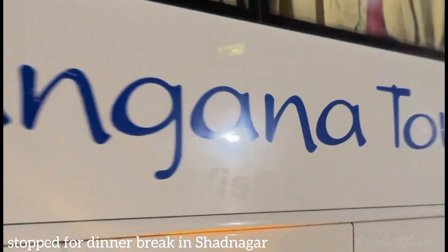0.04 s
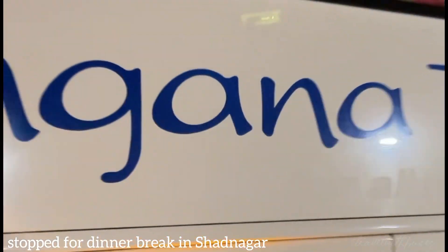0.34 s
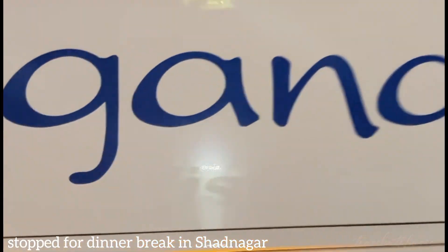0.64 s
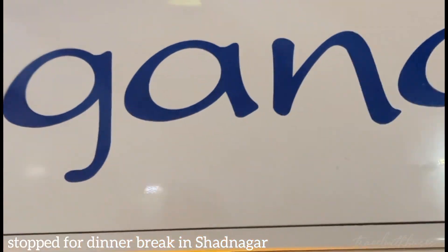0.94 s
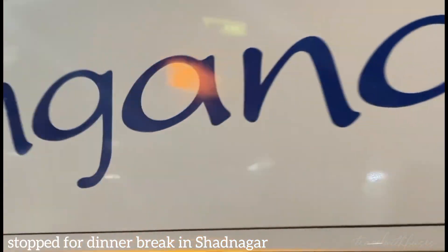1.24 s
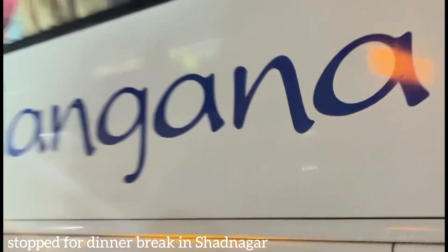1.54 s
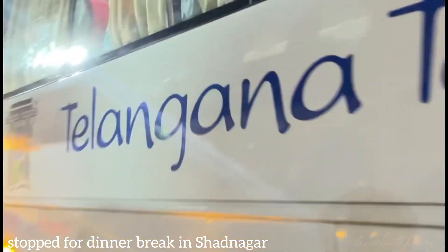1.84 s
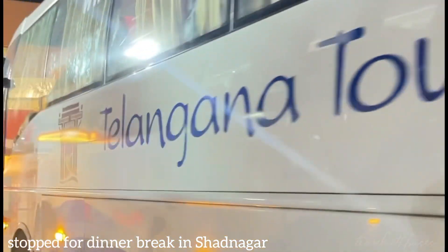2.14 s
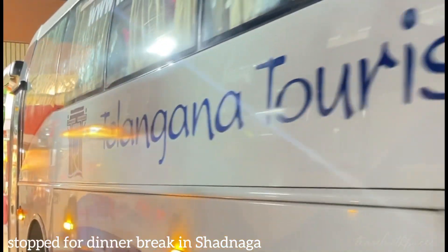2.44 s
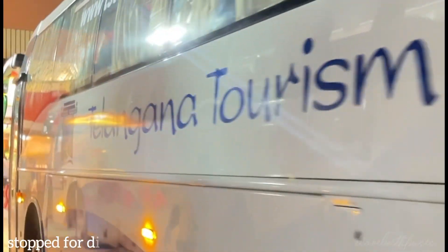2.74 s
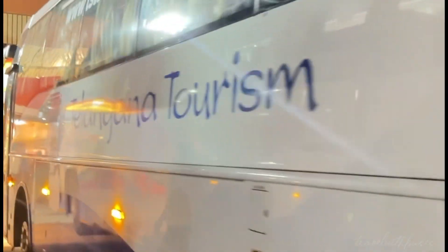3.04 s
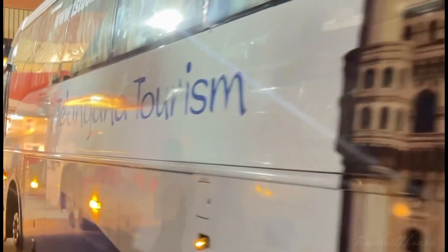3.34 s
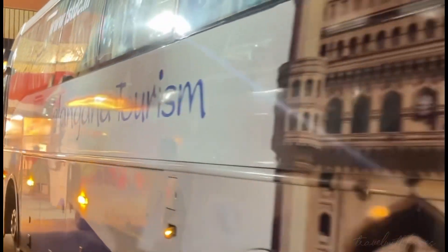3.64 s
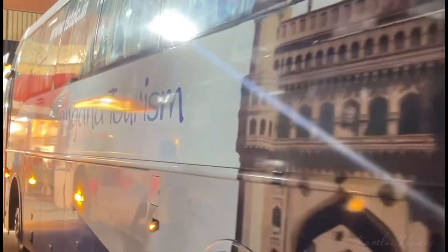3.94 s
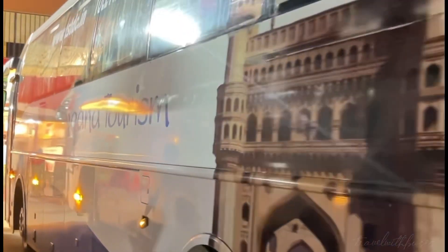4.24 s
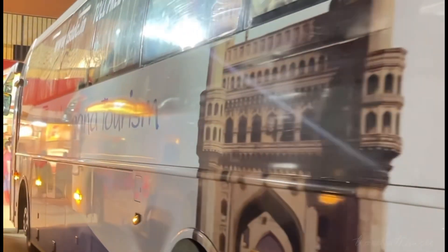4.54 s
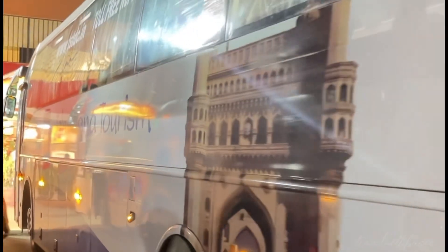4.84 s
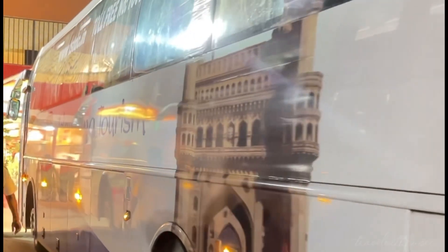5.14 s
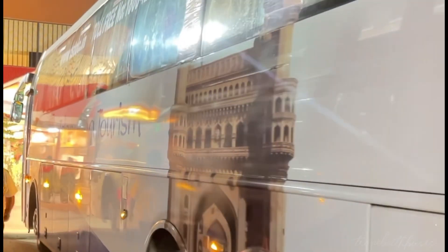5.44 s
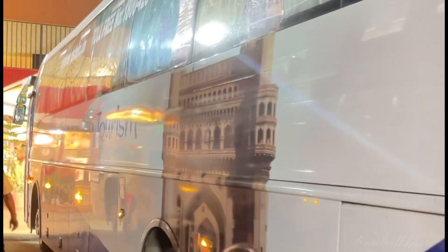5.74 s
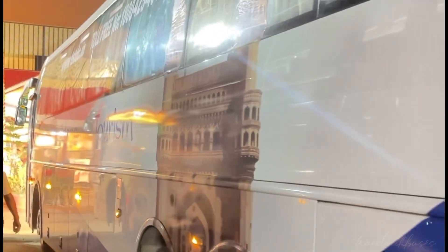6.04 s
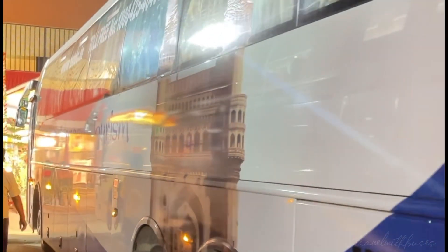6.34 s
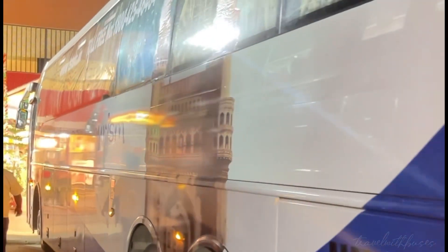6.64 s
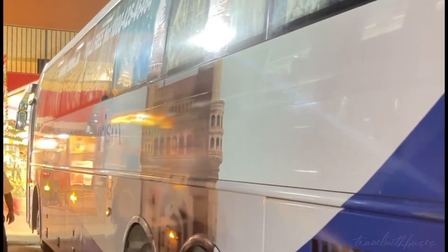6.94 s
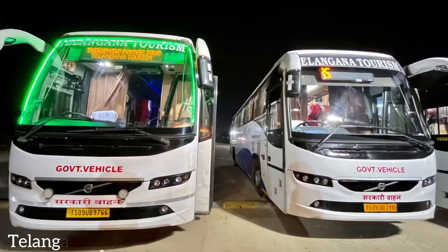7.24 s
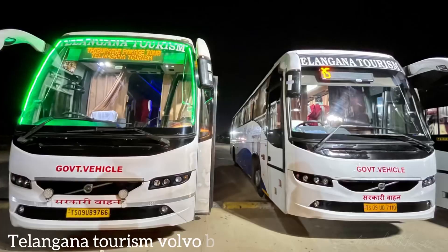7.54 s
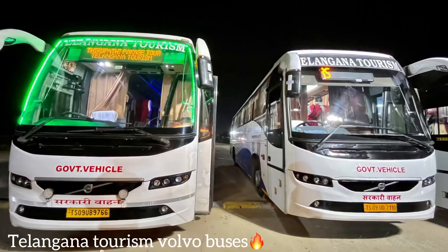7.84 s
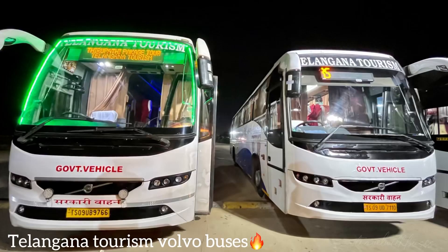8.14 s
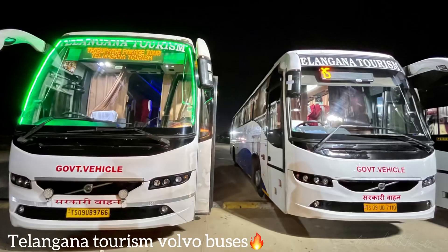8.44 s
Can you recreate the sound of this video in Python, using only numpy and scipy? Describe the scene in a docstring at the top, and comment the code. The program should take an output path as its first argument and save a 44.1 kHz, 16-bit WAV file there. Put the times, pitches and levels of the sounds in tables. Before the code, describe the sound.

Close by in an outdoor lot, a bus engine and its fan wind down over a faint gritty tyre rustle. Two blips of the throttle and a short air puff follow as the engine draws level. High, stuttering brake squeals give way to fainter ones over a rumbling idle. The sound drops out for an instant, then the parked bus idles on, clattering and whistling thinly.

```python
"""A diesel coach rolls slowly past, close by, in an open lot. Engine and fan wind down; tyres rustle on grit.
From 2.3 s the throttle is blipped twice, an air valve puffs and the engine bay draws level.
From 3.2 s the brakes stick and slip, squealing and scraping, while the engine settles to idle.
At 7.2 s, after a brief silence, the idle is heard from in front of the parked coach, with a thin whistle."""
import sys
import numpy as np
from scipy import signal
from scipy.fft import irfft, next_fast_len
from scipy.io import wavfile
from scipy.ndimage import uniform_filter1d

SR = 44100
rng = np.random.default_rng(int(sys.argv[2]) if len(sys.argv) > 2 else 0)


def wrap_up_sound(samples):
    """Save the sound to the file named by the first command line argument, as 16-bit audio."""
    columns = np.atleast_2d(samples).T
    # keep every value between -1 and 1, then stretch to whole-number steps
    tamed = np.clip(columns, -1, 1)
    steps = np.round(tamed * 32767).astype(np.int16)
    wavfile.write(sys.argv[1], SR, steps)


N = 382788
TIME = np.arange(N) / SR
IDLE_HZ, CUTOFF_HZ = 30.04, 14200
SIDE_LAG_S, FRONT_LAG_S = 0.0002457, -0.000178  # direct treble, right behind left

# Band edges in Hz of the four engine layers: boom, roar, clatter, hiss.
LAYER_EDGES_HZ = (42, 180, 700, 2800, 15000)
# At the flank and in front. Each row: frequency in Hz, left over right in dB.
BODY_BALANCE = [(200, 0.19), (670, 1.1), (2240, 0.24), (4090, 1.5)]


def passing_engine(rate_hz, throb_db, firings, ticks):
    """The engine, screened by the flank, then open at the bay, swells under load and draws off."""
    # Spectra. Each row: frequency in Hz, relative density in dB.
    flank_low = [(21, -45), (35, -18), (59, -2), (110, 0), (140, 1.5), (178, -3.5), (236, -6.5), (260, -4),
                 (279, -9.5), (431, -11), (469, -12.5), (694, -15.5), (1000, -15), (1300, -52),
                 (2200, -120)]
    flank_clatter = [(290, -30), (500, -9), (646, -7.5), (848, -6), (921, -8), (1430, -14), (1860, -17.5),
                     (3600, -35.5), (4680, -59), (7920, -120)]
    flank_hiss = [(2500, 4.5), (4200, -2.5), (5000, -4), (7000, -9), (10000, -17), (13000, -17.5),
                  (14500, -15)]
    bay_low = [(21, -38), (35, -6), (52, 0), (103, 3), (135, 4), (161, 0), (188, -1.5), (245, -3),
               (285, -3), (335, -5), (365, -5.5), (410, -7.5), (460, -7.5), (540, -10.5), (1000, -14),
               (1300, -46), (2200, -120)]
    bay_clatter = [(290, -30), (500, 0), (600, -1.5), (762, -5), (914, -5), (1200, -7.5), (1390, -11.5),
                   (2090, -16), (2720, -22.5), (3600, -21.5), (4680, -49), (7920, -120)]
    bay_hiss = [(2500, 1.5), (3300, 0), (4100, -1.5), (4900, -4.5), (5500, -6), (7000, -7.5), (9000, -12.5),
                (12000, -16.5), (14000, -15.5)]
    # Each row: frequency in Hz, side over mid in dB.
    width = [(60, -37), (110, -27), (200, -18), (370, -12.5), (670, -5), (1220, -6.5), (1850, -9.5),
             (2500, 6), (3600, 2)]
    # Each row: frequency in Hz, left over right in dB.
    bay_balance = [(200, 0), (370, -1), (670, 2), (1220, 3.5), (2240, -4), (4090, -1)]
    # Each row: multiple of the firing rate, relative level in dB.
    orders = [(1, -2.5), (2, 1.5), (4, -11.5), (4.5, -9.5)]
    arrival_s, approach_db_per_s = 3.053, 11.8
    before_s, after_s = np.maximum(arrival_s - TIME, 0), np.maximum(TIME - arrival_s, 0)
    pedal_bite, load = swell(2.8, 0.071), swell(3.66, 0.42)
    # Boom, roar, clatter, hiss.
    flank_db = np.array([-27 - 0.2 * TIME + pedal_bite,
                         -28 - 0.96 * TIME + pedal_bite,
                         -37 - 2 * TIME + 10.5 * pedal_bite,
                         -54 + 1.84 * TIME + 10 * pedal_bite]) - 20 * after_s
    bay_db = [-18.5 - approach_db_per_s * before_s - 0.99 * after_s - 0.5 * load,
              -20 - 16.2 * before_s - 0.75 * after_s + 2.5 * load,
              -27.5 - 17.6 * before_s - 0.3 * after_s + 1.05 * load,
              -43.5 - 22 * before_s + 0.22 * after_s - load]
    flank = engine_noise(firings, ticks, flank_db, (flank_low, flank_clatter, flank_hiss), width,
                         BODY_BALANCE, SIDE_LAG_S, knock=0.2, tick_db=-20, flutter_db=0.7)
    bay = engine_noise(firings, ticks, bay_db, (bay_low, bay_clatter, bay_hiss), width,
                       bay_balance, SIDE_LAG_S, knock=0.42, tick_db=-8, flutter_db=0.95)
    near = from_db(-approach_db_per_s * before_s)
    throb = exhaust(firings, orders, level_db=-41 * (1 - near) - 36.5 * near, blip_db=throb_db)
    return flank + bay + throb + passing_fan(rate_hz, near)


def parked_engine(rate_hz, firings, ticks):
    """Idle from in front: engine, fan, ringing covers, whistle and exhaust."""
    # Spectra. Each row: frequency in Hz, relative density in dB.
    low = [(21, -28), (35, -11), (53, -3), (110, 0), (150, -3), (183, -2.5), (199, -11.5), (211, -9.5),
           (243, -8.5), (291, -9), (369, -11.5), (503, -17), (755, -16), (1000, -9), (1300, -48),
           (2200, -120)]
    clatter = [(290, -44), (500, -11), (707, -1.5), (762, -0.5), (968, -7), (1050, -6), (1150, -11.5),
               (1550, -9.5), (1810, -18.5), (2250, -10.5), (2670, -16), (3230, -13), (3600, -7),
               (4680, -49), (7920, -120)]
    hiss = [(2000, -6), (2900, 4.5), (3400, -10), (4050, 2), (5000, -11), (6400, -7.5), (7800, -22.5),
            (10000, -15.5), (13000, -20.5), (14500, -17)]
    # Boom, roar, clatter, hiss in dB, before the layer trims.
    levels_db = [-26, -27.5, -33, -44.5]
    # Each row: frequency in Hz, side over mid in dB.
    width = [(60, -32), (110, -18), (200, -13), (370, -6), (670, -5.5), (1220, 3.5), (2240, -9),
             (4090, -11)]
    # Each row: multiple of the firing rate, relative level in dB.
    orders = [(1, 0), (2, -16), (2.5, -2), (4, -2), (5, -1)]
    engine = engine_noise(firings, ticks, levels_db, (low, clatter, hiss), width,
                          BODY_BALANCE, FRONT_LAG_S, knock=0.6, tick_db=-11, flutter_db=0.45)
    blades = fan(rate_hz, [-31, -40.5], waver_db=0.5, wobble=0.004)
    return engine + blades + cover_rings(firings) + whistle() + exhaust(firings, orders, level_db=-33)


def throttle():
    """Firing rate and extra exhaust throb: blips raise both; the flywheel slows the fall in speed."""
    # Each row: start, top and end in seconds, extra firing rate in Hz, extra throb in dB.
    blips = [(2.28, 3.08, 3.34, 6.8, 15.5), (3.45, 3.622, 4.4, 3.5, 7)]
    rate_hz = np.maximum(41.51 - 4.4 * TIME, IDLE_HZ)
    throb_db = 0
    for start_s, top_s, end_s, extra_hz, extra_db in blips:
        pedal = np.interp(TIME, [start_s, top_s, end_s], [0, 1, 0])
        rate_hz += extra_hz * pedal
        throb_db += extra_db * pedal ** 0.65
    spin_down_hz = 5.2 * TIME
    rate_hz = np.maximum.accumulate(rate_hz + spin_down_hz) - spin_down_hz
    sag_hz = 0.9 * swell(4.6, 0.7)
    return rate_hz - sag_hz, throb_db


def engine_noise(firings, ticks, levels_db, spectra, width, balance, lag_s, knock, tick_db, flutter_db):
    """Exhaust boom, body roar, combustion clatter and rattling hiss, pulsing with the firings."""
    low_spectrum, clatter_spectrum, hiss_spectrum = spectra
    boom = stereo_noise(low_spectrum, width, balance, LAYER_EDGES_HZ[0:2]) * from_db(-1)
    roar = stereo_noise(low_spectrum, width, balance, LAYER_EDGES_HZ[1:3]) * from_db(-0.5)
    clatter = stereo_noise(clatter_spectrum, width, balance, LAYER_EDGES_HZ[2:4])
    hiss = stereo_hiss(lag_s, hiss_spectrum)
    push = firing_pulses(firings, depth=0.38, decay=0.93)
    burst = firing_pulses(firings, depth=knock, decay=0.17) * from_db(flutter_db * drift(9.3))
    top = signal.sosfiltfilt(signal.butter(2, 7500, "high", fs=SR, output="sos"), hiss)
    hiss += top * (unit_rms(from_db(1.7 * drift(70))) - 1)  # loose parts chatter
    layers = boom * push, roar * push, clatter * burst + from_db(tick_db) * ticks, hiss * burst
    return sum(from_db(db) * layer for db, layer in zip(levels_db, layers))


def firing_pulses(firings, depth, decay):
    """Envelope of uneven combustion strokes; decay is in firing periods."""
    # Relative strength of each of the six cylinders in dB.
    cylinder_db = [0.99, -.8, 0.56, -0.94, .8, -.4]
    stroke = firings.astype(int)
    stroke_db = np.array(cylinder_db)[stroke % 6] + 2.6 * rng.uniform(-1.3, 1, size=400)[stroke]
    bursts = from_db(stroke_db) * np.exp(-(firings % 1) / decay)
    return unit_rms(1 + depth * uniform_filter1d(bursts, size=220))  # reflections blunt the onset


def exhaust(firings, orders, level_db, blip_db=0):
    """Partials of the firing pulses: a blip lifts the lowest most, the upper ones waver most."""
    partials = 0
    for order, db in orders:
        waver_db = min(order, 3) * 0.33 * drift(2.8)
        phase = 2 * np.pi * (order * firings + rng.random())
        partials += from_db(db + blip_db / np.sqrt(order) + waver_db) * np.sin(phase)
    return np.sqrt(2) * from_db(level_db) * partials


def valve_ticks(firings):
    """Valves and injectors tap four times a firing, unevenly, and ring the block."""
    # Each row: frequency in Hz, width in Hz, relative level in dB.
    block_modes = [(768, 63, 10), (1050, 97, 1), (1514, 120, -3), (2270, 460, -7)]
    taps = np.diff(np.floor(4 * firings + 0.15 * drift(60)), prepend=0) > 0
    ticks = np.zeros((2, N))
    for hz, width_hz, db in block_modes:
        clicks = np.zeros((2, N))
        clicks[:, taps] = rng.uniform(-1.7, 1, taps.sum()) + 0.5 * rng.uniform(-1.6, 1, (2, taps.sum()))
        ticks += from_db(db) * resonate(clicks + 1e-18, hz, width_hz)
    return unit_rms(ticks)


def booms():
    """The rumble swells briefly around single unsteady pitches."""
    # Each row: middle and half length in seconds, pitch in Hz, level in dB.
    swells = [(.1, 0.63, 176, -33), (1.18, .07, 150, -29.5), (1.38, 0.15, 60.3, -29),
              (2.5, 0.47, 83.6, -34), (3.18, 0.067, 306, -22), (3.5, .15, 152.2, -22),
              (4.03, 0.05, 94, -22.5), (4.21, 0.13, 349.4, -25), (4.32, 0.033, 125.3, -16.5),
              (4.435, 0.098, 100, -23), (5.143, 0.11, 121.7, -21.5), (5.95, .45, 275, -29),
              (6.977, 0.04, 285, -23.5)]
    return sum(swell(middle_s, half_s) * tone(hz, [db], waver_db=0.5, wobble=0.0309)
               for middle_s, half_s, hz, db in swells)


def bay_growl(air, firings):
    """Every firing strikes a resonance of the receding engine bay."""
    knocking = air * firing_pulses(firings, depth=7.5, decay=0.15)
    return from_db(-33.5) * swell(5.84, 0.86) * noise_band(knocking, hz=1187, width_hz=250)


def cover_rings(firings):
    """Covers and injector pipes ring with the firings."""
    # Each row: frequency in Hz, width in Hz, level in dB.
    modes = [(772, 35, -40.5), (902, 30, -41), (1074, 54, -42), (2290, 90, -45.5), (3950, 170, -51.5)]
    shaking = stereo_hiss(FRONT_LAG_S) * firing_pulses(firings, depth=2.7, decay=0.15)
    return sum(from_db(db) * noise_band(shaking, hz, width_hz) for hz, width_hz, db in modes)


def fan(rate_hz, partials_db, waver_db, wobble):
    """Blade tone of the cooling fan, geared to the engine."""
    blades_per_firing = 6.14
    return tone(blades_per_firing * rate_hz, partials_db, waver_db, wobble)


def passing_fan(rate_hz, near):
    """The fan grows as the bay nears; single partials stand out as speed and position change."""
    # Each row: partial number, middle and half length in seconds, extra level in dB.
    swells = [(1, .05, 0.2, 2.5), (3, 0.38, 0.63, 10), (2, 1.4, 0.18, 12), (2, 2.27, 0.43, 9),
              (1, 3.15, .15, 8.5), (1, 3.7, 0.2, 10), (2, 5.5, .7, 6.5), (1, 6.7, .3, 7)]
    flank_db, bay_db = [-36.5, -50.5, -52.5], [-32.5, -39.5, -43]
    partials_db = np.outer(flank_db, 1 - near) + np.outer(bay_db, near)
    for partial, middle_s, half_s, db in swells:
        partials_db[round(partial) - 1] += db * swell(middle_s, half_s)
    return fan(rate_hz, partials_db, waver_db=2.5, wobble=0.008)


def brake_squeals():
    """Pads stick and slip, exciting disc modes; reflections make each side waver on its own."""
    # Each row: start and length in seconds, pitch and slide in Hz, level in dB.
    squeals = [(3.217, 0.045, 13030, 50, -34.5), (3.25, 0.06, 6870, 60, -37), (3.25, 0.13, 13130, 60, -42),
               (3.272, 0.085, 12500, 60, -41), (3.275, 0.052, 6272, 0, -29.5), (3.31, .045, 5245, 5, -34),
               (3.328, .072, 6297, 10, -25), (3.358, .082, 5272, 0, -18), (3.4, .11, 6640, 30, -43),
               (3.44, 0.065, 5274, 0, -18), (3.44, .04, 13190, 0, -46), (3.493, .085, 5268, 0, -18.5),
               (3.565, 0.078, 5269, 0, -26.5), (3.59, 0.125, 7465, 15, -32.5), (3.7, 0.19, 5915, 20, -39),
               (3.96, 0.11, 5910, 2, -43), (4.085, 0.24, 4998, 0, -39), (4.27, 0.24, 5105, 5, -45),
               (4.48, .11, 5112, 8, -42), (4.63, .22, 5145, 0, -50), (4.93, .26, 5020, -8, -46),
               (5.41, .16, 5005, -30, -37.5), (5.56, 0.08, 4980, 0, -44), (5.645, .075, 4976, 0, -39),
               (5.69, .19, 4840, -115, -41), (5.755, 0.06, 4780, -28, -37), (6.7, 0.3, 11150, 2, -51),
               (6.79, 0.19, 3920, -5, -44), (7.03, 0.12, 3935, -8, -45)]
    attack_share, release_share, octave_db, flutter_db = 0.27, 0.33, -22, 3.8
    wander = 0.0003 * drift(25)
    flicker = 0.6 * drift(45) + 0.8 * np.array([drift(14), drift(14)])
    flutter = unit_rms(from_db(flutter_db * flicker.clip(-3, 1.5)))
    out = np.zeros((2, N))
    for start_s, length_s, hz, slide_hz, db in squeals:
        active = (TIME > start_s) & (TIME < start_s + length_s)
        progress = (TIME[active] - start_s) / length_s
        ramp = np.minimum(progress / attack_share, (1 - progress) / release_share)
        grip = np.sin(np.pi / 2 * np.minimum(ramp, 1)) ** 2
        cycles = np.cumsum((hz + slide_hz * progress) * (1 + wander[active])) / SR
        phase = 2 * np.pi * np.array([cycles, cycles - hz * SIDE_LAG_S])
        octave = from_db(octave_db) * grip * np.sin(2 * phase) * (2 * hz < CUTOFF_HZ)
        out[:, active] += from_db(db) * grip * flutter[:, active] * (np.sin(phase) + octave)
    return out


def pad_scrape(air):
    """The brake pads scrape as they bite."""
    return from_db(-37) * swell(3.69, 0.28) * noise_band(air, hz=3050, width_hz=800)


def air_valve(air):
    """Compressed air puffs through a narrow port."""
    # Each row: start, rise and decay in seconds, centre and width in Hz, level in dB.
    puffs = [(2.519, 0.003, 0.049, 6950, 4020, -32.5), (2.519, .004, 0.04, 12500, 3000, -38),
             (3.055, .002, 0.04, 8040, 900, -35.5)]
    out = np.zeros((2, N))
    for start_s, rise_s, decay_s, hz, width_hz, db in puffs:
        age_s = np.maximum(TIME - start_s, 0)
        flow = np.minimum(age_s / rise_s, 1) * np.exp(-np.maximum(age_s - rise_s, 0) / decay_s)
        out += from_db(db) * flow * noise_band(air, hz, width_hz)
    return out


def tyre_grit(air):
    """Tyres rub on grit in grainy rustles."""
    # Each row: middle and half length in seconds, centre in Hz, level in dB.
    rubs = [(.17, 0.045, 5200, -51), (.36, 0.059, 6000, -54), (0.632, 0.006, 5400, -48),
            (.77, .025, 11000, -56), (0.936, 0.099, 7300, -53.5), (.99, .004, 6500, -47),
            (1.428, 0.029, 7000, -53), (1.652, 0.02, 5400, -47), (1.81, .04, 6000, -58),
            (2.38, .035, 7500, -55), (2.93, .01, 7500, -49)]
    rustle = sum(from_db(db) * swell(middle_s, half_s) * noise_band(air, hz, width_hz=4400)
                 for middle_s, half_s, hz, db in rubs)
    grain = unit_rms(from_db(2 * drift(90)))
    return grain * rustle


def whistle():
    """A thin, steady pitch that swells twice."""
    # Each row: start and end in seconds, extra level in dB.
    swells = [(7.4, 8.043, 12.5), (8.41, 8.53, 13)]
    base_db, edge_s = -58, 0.06
    extra_db = sum(db * np.clip(np.minimum(TIME - start_s, end_s - TIME) / edge_s, 0, 1)
                   for start_s, end_s, db in swells)
    return tone(2591, [base_db + extra_db], waver_db=2, wobble=0.0009)


def lot_echo(pair, echo_db=-19, t60_s=0.55):
    """Sound rings on between coaches, differently on each side."""
    age_s = TIME[:SR // 2]
    tail = rng.standard_normal((2, len(age_s))) * from_db(-60 * age_s / t60_s)
    tail /= np.sqrt(np.sum(tail ** 2, axis=1, keepdims=True))
    return pair + from_db(echo_db) * signal.fftconvolve(pair, tail, axes=1)[:, :N]


def stereo_noise(spectrum, width, balance, edges_hz):
    """A noise band, wider where ground and coach reflect it; mid rms 1."""
    size = next_fast_len(N, real=True)
    hz = np.maximum(np.arange(size // 2 + 1) * SR / size, 1)
    mid, side = white_spectra(len(hz), channels=2) * band_shape(spectrum, hz, edges_hz)
    side *= gain_at(width, hz)
    lean = np.sqrt(gain_at(balance, hz))
    pair = irfft(np.array([(mid + side) * lean, (mid - side) / lean]), size)[:, :N]
    return pair / np.std(pair.mean(axis=0))


def stereo_hiss(lag_s, spectrum=None):
    """Hiss whose direct part reaches the two sides in turn, the rest scattered; mid rms 1."""
    # Each row: frequency in Hz, direct share of the power before the cap.
    direct_share = [(3000, 0.33), (4800, 0.29), (6000, 1), (13000, 1)]
    size = next_fast_len(N, real=True)
    hz = np.arange(size // 2 + 1) * SR / size
    share = np.clip(np.interp(hz, *np.transpose(direct_share)), 0, 0.95)
    direct, left, right = white_spectra(len(hz), channels=3)
    delayed = direct * np.exp(-2j * np.pi * hz * lag_s)
    both = np.sqrt(share) * np.array([direct, delayed]) + np.sqrt(1 - share) * np.array([left, right])
    if spectrum:
        both *= band_shape(spectrum, hz, LAYER_EDGES_HZ[-2:])
    pair = irfft(both, size)[:, :N]
    return pair / np.std(pair.mean(axis=0))


def white_spectra(size, channels):
    """Spectra of independent white noises."""
    return rng.standard_normal((channels, 2 * size)).view(complex)


def band_shape(spectrum, hz, edges_hz):
    """Gains of a spectrum between two steep edges."""
    hz = np.maximum(hz, 1)
    skirts = (1 + (edges_hz[0] / hz) ** 12) * (1 + (hz / edges_hz[1]) ** 12)
    return gain_at(spectrum, hz) / np.sqrt(skirts)


def gain_at(points, hz):
    """Gains from (Hz, dB) rows, interpolated over log frequency."""
    known_hz, db = np.transpose(points)
    return from_db(np.interp(np.log(hz), np.log(known_hz), db))


def tone(hz, partials_db, waver_db, wobble):
    """Harmonics wavering in level and pitch; wobble is a fraction of the pitch."""
    phase = 2 * np.pi * np.cumsum(hz * (1 + wobble * drift(7.56))) / SR
    return np.sqrt(2) * sum(from_db(db + waver_db * drift(4.4)) * np.sin(k * phase)
                            for k, db in enumerate(partials_db, 1))


def noise_band(noise, hz, width_hz):
    """Resonant noise, rms 1."""
    return unit_rms(resonate(noise, hz, width_hz))


def resonate(x, hz, width_hz):
    """Two equal resonators in series, each width_hz wide; peak gain 1."""
    r = np.exp(-np.pi * width_hz / SR)
    b = np.array([1, 0, -1]) * (1 - r * r) / 2
    a = [1, -2 * r * np.cos(2 * np.pi * hz / SR), r * r]
    return signal.lfilter(b, a, signal.lfilter(b, a, x))


def drift(rate_hz):
    """Slow random wander, rms 1."""
    hop, warm_up = 40, 2000
    r = np.exp(-2 * np.pi * rate_hz * hop / SR)
    noise = rng.standard_normal(N // hop + warm_up + 2)
    slow = unit_rms(signal.lfilter([1], [1, -2 * r, r * r], noise)[warm_up:])
    return np.interp(np.arange(N) / hop, np.arange(len(slow)), slow)


def swell(middle_s, half_s):
    """Bell curve, peak 1."""
    return np.exp(-np.minimum(((TIME - middle_s) / half_s) ** 2, 20))


def unit_rms(x):
    """Scale to rms 1."""
    return x / np.sqrt(np.mean(x ** 2) + 1e-20)


def from_db(db):
    """Decibels to gain."""
    return 10 ** (np.asarray(db) / 20)


def scene():
    """Beside the moving coach, a short silence, then in front of it."""
    silence_start_s, silence_end_s = 7.195, 7.243
    rate_hz, throb_db = throttle()
    firings = np.cumsum(rate_hz) / SR
    ticks, air = valve_ticks(firings), stereo_hiss(SIDE_LAG_S)
    beside = passing_engine(rate_hz, throb_db, firings, ticks)
    beside += lot_echo(brake_squeals()) + pad_scrape(air) + air_valve(air) + tyre_grit(air)
    beside += booms() + bay_growl(air, firings)
    in_front = parked_engine(rate_hz, firings, ticks)
    return beside * (TIME < silence_start_s) + in_front * (TIME > silence_end_s)


def record(dry):
    """Steep low-pass."""
    return signal.sosfilt(signal.ellip(10, 0.1, 80, CUTOFF_HZ, fs=SR, output="sos"), dry)


dry = scene()
out = record(dry)
wrap_up_sound(out)
```